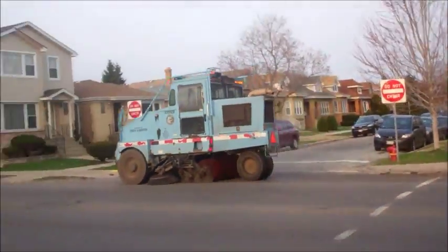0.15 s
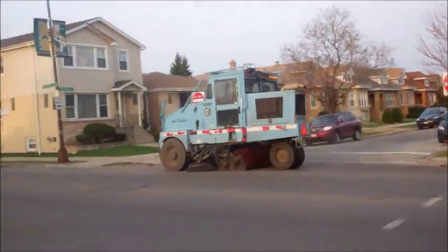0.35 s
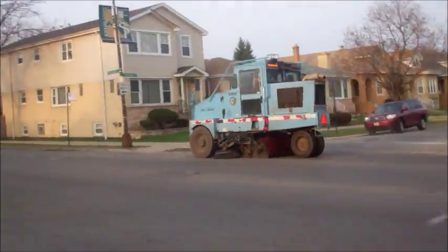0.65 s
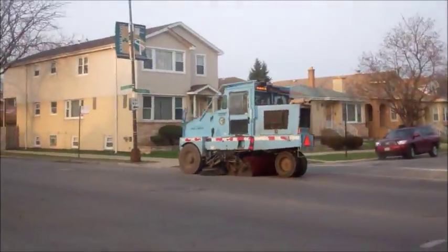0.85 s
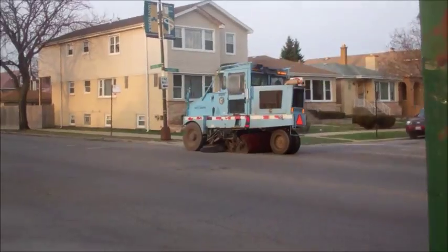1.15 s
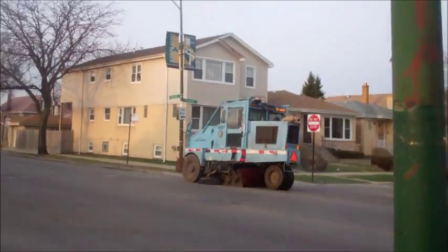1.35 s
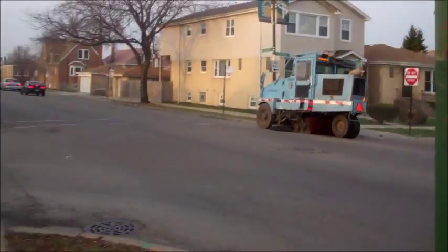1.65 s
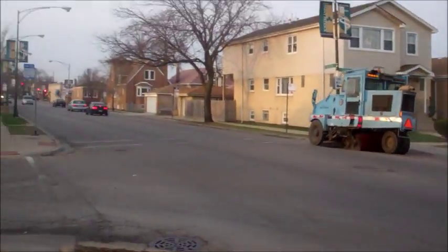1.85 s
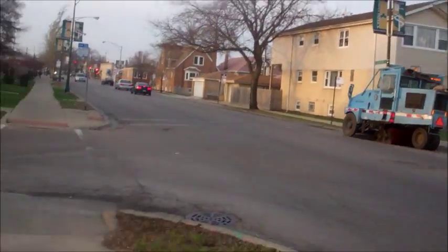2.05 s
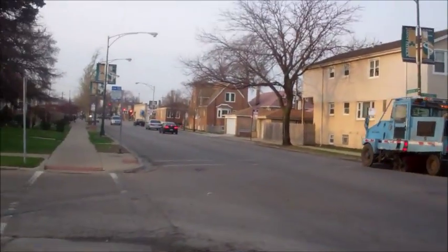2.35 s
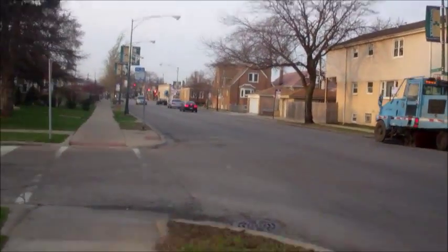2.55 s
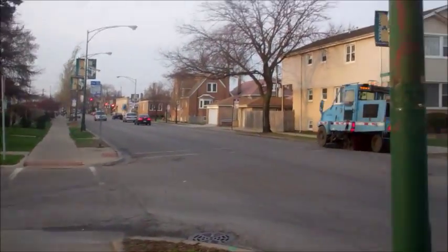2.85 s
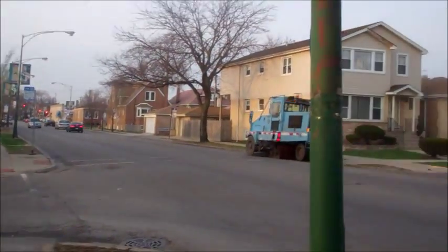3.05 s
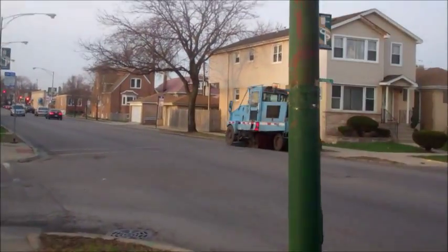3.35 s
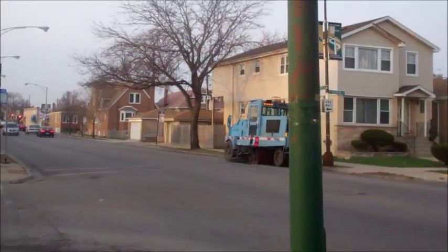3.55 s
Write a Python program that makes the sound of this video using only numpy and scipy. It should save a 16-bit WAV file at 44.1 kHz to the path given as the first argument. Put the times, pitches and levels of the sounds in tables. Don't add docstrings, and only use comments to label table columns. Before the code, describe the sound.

A street sweeper drones and roars, its brushes hissing on asphalt while wind buffets the microphone.

```python
import sys
import numpy as np
from scipy import signal
from scipy.fft import rfft, irfft
from scipy.io import wavfile
from scipy.ndimage import uniform_filter1d

SR = 44100
rng = np.random.default_rng(int(sys.argv[2]) if len(sys.argv) > 2 else 0)


def put_to_file(sound):
    columns = np.atleast_2d(sound).T
    safe = np.clip(columns, -1, 1)
    whole_steps = np.round(safe * 32767)
    wavfile.write(sys.argv[1], SR, whole_steps.astype(np.int16))


def volts_from_decibels(level):
    exponent = np.asarray(level, float) / 20
    return 10 ** exponent


N = 163611
TIME_S = np.arange(N) / SR
FRAME_S = np.arange(N // 256 + 5) * 256 / SR
HZ = np.fft.rfftfreq(1024, 1 / SR)

# [t/s, firing rate f/Hz, turned away 0-1.4]
DRIVE = [(0, 76.7, 0), (.5, 76.9, .1), (1, 77.7, .3), (1.6, 78.5, .55), (2.2, 78.5, .9), (2.8, 78.6, 1),
         (3.3, 78.6, 1.15), (3.71, 78.5, 1.35)]
# [t/s, lag/microseconds]
LAG = [(.18, -5), (.55, 10), (.9, 15), (1.3, 3), (1.65, 19), (2, 47), (2.35, 44.5), (2.7, 55), (2.9, 44),
       (3.1, 26), (3.35, 5), (3.6, -4)]
LAG_FROM_HZ = 3200


def evened(x):
    return x / np.sqrt(np.mean(x ** 2) + 1e-20)


def read(points, hz):
    f, value = np.transpose(points)
    return np.interp(np.log(hz + 1), np.log(f + 1), value)


def curve(table, t, axis=1):
    points = np.array(table)
    return np.interp(t, points[:, 0], points[:, axis])


def drift(top_hz, t):
    phases = rng.random(24)
    rates = np.geomspace(top_hz / 10, top_hz, len(phases))
    return evened(sum(np.sin(2 * np.pi * (f * t + p)) / np.sqrt(f) for f, p in zip(rates, phases)))


def coarse_drift(top_hz):
    return np.repeat(drift(top_hz, TIME_S[::64]), 64)[:N]


def rush(field_db, same, patchy_db, flicker_db):
    a, b, c, d, patches = rng.standard_normal((len(FRAME_S), len(HZ), 5)).T
    patches = uniform_filter1d(patches, size=14, axis=0)
    patches = evened(uniform_filter1d(patches, size=7, axis=1))
    shared = a + 1j * b
    private = c + 1j * d
    lagging_hz = HZ - 0.47 * HZ / (1 + (HZ / LAG_FROM_HZ) ** 6)
    late = np.exp(-2j * np.pi * lagging_hz[:, None] * curve(LAG, FRAME_S) / 10 ** 6)
    z = np.array([shared * late, same * shared + np.sqrt(1 - same ** 2) * private])
    z *= volts_from_decibels(field_db + patchy_db * patches + flicker_db * drift(25.11, FRAME_S))
    return signal.istft(z, nperseg=1024, noverlap=768)[1][:, :N]


def layer(spectrum, swing_db, level_db, same, patchy_db, flicker_db):
    field_db = read(spectrum, HZ)[:, None] + swing_db
    return volts_from_decibels(level_db) * evened(rush(field_db, same, patchy_db, flicker_db))


def ports():
    # [f/Hz, likeness 0-1]
    likeness = [(60, 0.93), (700, 0.96), (1400, 0.87), (2750, 0.85), (4800, .66), (6900, 0.4), (8300, 0.82),
                (14000, 0.59)]
    loss_per_us = 0.0036
    lag_us = np.maximum(curve(LAG, FRAME_S), 0)
    loss = loss_per_us * lag_us / (1 + (HZ[:, None] / LAG_FROM_HZ) ** 4)
    return np.clip(read(likeness, HZ)[:, None] * (1 - loss), 0, .99)


def wind():
    # [t/s, level/dB]
    gusts = [(0, -61), (1.75, -51.5), (1.95, -43), (2.2, -39), (2.5, -45), (2.75, -38), (3, -43),
             (3.5, -49), (3.71, -53)]
    # [f/Hz, level/dB per Hz]
    rumble = [(25, -22), (60, -6), (150, 2), (300, 3), (450, 2), (650, -14), (1000, -36)]
    # [t/s, peak level/dB, f/Hz]
    pops_left = [(.556, -29, 198), (.572, -25, 200), (1.86, -28, 153), (2.17, -16.5, 222),
                 (2.196, -20, 260), (2.219, -18, 300), (2.227, -25, 400), (2.245, -25, 230),
                 (2.259, -21, 320), (2.281, -25, 150), (2.346, -29, 200), (2.402, -20.5, 250),
                 (2.458, -24, 150), (2.537, -26, 200), (2.576, -28, 130), (2.716, -21, 280),
                 (2.724, -22, 402), (2.739, -15.5, 252), (3.218, -29, 150), (3.23, -21, 252),
                 (3.442, -21, 348.7), (3.529, -36, 200)]
    # [t/s, peak level/dB, f/Hz]
    pops_right = [(0.357, -26, 130), (0.601, -29, 130), (1.99, -22, 300), (2.002, -17.5, 370),
                  (2.019, -18, 250), (2.499, -20, 350), (2.968, -30, 120), (3.062, -21, 180),
                  (3.465, -18, 350), (3.49, -16, 190), (3.529, -16, 257), (3.628, -36, 220),
                  (3.704, -30, 200)]
    db = curve(gusts, FRAME_S)
    out = layer(rumble, db - db.mean(), db.mean(), 0, patchy_db=-1.5, flicker_db=4.0)
    for port, pops in enumerate((pops_left, pops_right)):
        for s, peak_db, hz in pops:
            cycles = (TIME_S - s) * hz
            out[port] += volts_from_decibels(peak_db) * np.sin(2 * np.pi * cycles - 1.0) * np.exp(-(cycles / 0.52) ** 2)
    return out


def housing():
    # [t/s, f/Hz, level/dB]
    whistle = [(0, 1420, -45), (.35, 1460, -47), (.7, 1460, -51), (1.05, 1900, -46), (1.25, 1880, -44),
               (1.45, 1840, -52), (1.68, 1830, -44), (1.95, 1810, -53), (2.5, 1780, -54),
               (2.8, 1880, -41.5), (3, 1870, -48), (3.3, 1830, -43), (3.5, 1820, -42.5),
               (3.71, 1800, -42.5)]
    width_hz = 110
    shape = 1 / (1 + ((HZ[:, None] - curve(whistle, FRAME_S)) / width_hz) ** 2)
    hiss = evened(rush(20 * np.log10(shape), ports(), patchy_db=-1.5, flicker_db=-3.0))
    return volts_from_decibels(curve(whistle, TIME_S, axis=2)) * hiss


def brushes():
    # [f/Hz, level/dB per Hz]
    bristles = [(800, -46), (2000, -15), (3500, -1.5), (5000, -1.5), (7000, -3), (10000, -2), (12500, -0.5),
                (14200, 1)]
    # [t/s, level/dB]
    pressure = [(0, -25), (.2, -26.5), (.47, -23), (.56, -26.5), (.81, -28), (.9, -25.5), (1.08, -29),
                (1.25, -27.5), (1.75, -27), (1.92, -28), (2.46, -28.5), (2.58, -25.5), (2.7, -31),
                (2.84, -27.5), (3.15, -29), (3.27, -27), (3.4, -30.5), (3.6, -27), (3.71, -26.5)]
    brighten = 0.17
    db = curve(pressure, FRAME_S)
    share = 1 + brighten * np.log2(HZ / 7000 + 0.071)[:, None]
    swing_db = share * (db - db.mean())
    return layer(bristles, swing_db, db.mean() + 4.0, ports(), patchy_db=0.65, flicker_db=0.5)


def fan():
    # [f/Hz, level/dB per Hz]
    body = [(30, -24), (60, -18), (110, -9), (200, -3), (380, -7.5), (950, -6), (2400, -6.5), (5000, -12.5)]
    # [t/s, level/dB]
    roar = [(0, -34), (.5, -35), (1.1, -37.5), (1.25, -35.5), (1.36, -38), (1.75, -36), (1.88, -38.5),
            (2, -35.5), (2.58, -35), (2.65, -38.5), (2.83, -35), (2.91, -41.5), (3.01, -37), (3.4, -36.5),
            (3.5, -34), (3.71, -36)]
    db = curve(roar, FRAME_S)
    return layer(body, db - db.mean(), db.mean() + 5.0, ports(), patchy_db=1.13, flicker_db=0.5)


def intake():
    # [f/Hz, width/Hz, level/dB]
    hollows = [(620, 68, -7), (653, 43, -11), (690, 34, -5), (944, 33, -8.5), (1373, 60, -5),
               (1880, 240, -17)]
    # [t/s, level/dB]
    mouth = [(0, -42), (.1, -38.5), (.45, -38.5), (.6, -40), (.72, -42), (.9, -43), (1.12, -40.5),
             (1.22, -56), (1.36, -42), (1.5, -50), (1.62, -49), (1.8, -52), (2.6, -51), (2.75, -38.5),
             (2.92, -49), (3.1, -46), (3.35, -48), (3.48, -41), (3.71, -43.5)]
    # [t/s, pitch factor]
    swing = [(0, 1.01), (.2, 1.06), (.35, .98), (.5, 1.06), (.7, 1), (.88, 1), (1.05, 1), (1.3, 1.06),
             (1.6, 1.12), (2.3, 0.92), (2.9, 0.8), (3.1, 0.96), (3.71, 0.88)]
    throb_depth = .3
    seen = HZ[:, None] / curve(swing, FRAME_S)
    shape = sum(volts_from_decibels(db) / (1 + ((seen - hz) / width) ** 2) for hz, width, db in hollows)
    air = evened(rush(20 * np.log10(shape), ports() ** 0.77, patchy_db=0.0, flicker_db=0.1))
    firings = np.cumsum(curve(DRIVE, TIME_S)) / SR
    throb = 1 + throb_depth * np.cos(2 * np.pi * firings)
    return volts_from_decibels(curve(mouth, TIME_S)) * throb * air


def engine():
    # [t/s, level/dB]
    pump_load = [(0, -53), (.36, -52), (.43, -46), (.95, -43), (1.12, -45), (1.19, -56), (1.5, -51),
                 (1.7, -44), (2.3, -44), (2.8, -41.5), (3.12, -44), (3.2, -52), (3.33, -51), (3.44, -40),
                 (3.71, -42)]
    # [t/s, level/dB]
    exhaust = [(0, -39.5), (.6, -39.5), (1, -39), (1.6, -39), (2.2, -36.5), (2.65, -38), (2.8, -31.5),
               (2.95, -36.5), (3.3, -33.5), (3.71, -36)]
    # [multiple of half the firing rate, side-on level/dB, level from behind/dB]
    crank = [(3, -36, -18.5), (5, -14, -15), (7, -9.5, -10), (8, -17, -15.5), (9, -22, -15), (10, -31, -21),
             (14, -45, -28), (15, -9, -23), (16, -6, -18), (17, -4.5, -18), (19, -12, -49), (36, -20, -17)]
    # [t/s, firing level/dB, second level/dB, third level/dB, ninth level/dB]
    strong = [(0, -41, -39, -42, -38.5), (.25, -44, -40, -46, -45), (.45, -44, -39.5, -42.5, -43.5),
              (.65, -44, -40, -42, -58), (.85, -44.5, -44, -44, -56), (1.05, -43.5, -45, -43.5, -40.5),
              (1.25, -48.5, -42.5, -47, -54), (1.45, -47, -43, -49, -57), (1.65, -47, -42.5, -44, -63),
              (1.85, -46.5, -43, -42.5, -59), (2.05, -49, -43, -40.5, -70), (2.25, -45, -37.5, -38, -56),
              (2.45, -46, -40.5, -39.5, -60), (2.65, -47, -39.5, -43, -65), (2.85, -53, -40.5, -42.5, -67),
              (3.05, -47, -44.5, -39.5, -65), (3.25, -51, -43, -40, -73), (3.45, -49, -41, -36, -67),
              (3.71, -57, -40, -36, -62)]
    pump_order, pump_trim_db, pump_waver_db = 6, -2.0, .6
    wobble = .002
    pulse_spread = .16
    waver_db, strong_waver_db = 1.0, .5

    speed_hz = curve(DRIVE, TIME_S) / 2
    turns = np.cumsum(speed_hz * (1 + wobble * drift(8.01, TIME_S))) / SR
    away = np.clip(curve(DRIVE, TIME_S, axis=2), 0, 1.4)

    pump_db = curve(pump_load, TIME_S) + pump_trim_db + pump_waver_db * drift(19, TIME_S)
    out = volts_from_decibels(pump_db) * np.sqrt(2) * np.sin(4 * np.pi * pump_order * turns)
    for multiple, side_db, rear_db in crank:
        db = side_db + (rear_db - side_db) * away + waver_db * coarse_drift(10)
        cycles = multiple * turns + pulse_spread * coarse_drift(.9)
        out -= volts_from_decibels(curve(exhaust, TIME_S) + db) * np.cos(2 * np.pi * cycles)
    for column, multiple in enumerate((2, 4, 6, 18), start=1):
        db = curve(strong, TIME_S, axis=column) + strong_waver_db * coarse_drift(10)
        cycles = multiple * turns + pulse_spread * coarse_drift(.9)
        out -= volts_from_decibels(db) * np.sqrt(2) * np.cos(2 * np.pi * cycles)
    return out


def scene():
    # [f/Hz, left minus right level/dB]
    lean = [(60, -5.5), (250, -8), (1290, -7), (2400, -6.5), (4000, -4), (7000, -6.5), (10500, -6),
            (14000, -9)]
    # [f/Hz, width/Hz, level/dB]
    cavity = [(7040, 240, 1), (10440, 630, -5)]
    machine = engine() + intake() + fan() + brushes() + housing()
    hz = np.fft.rfftfreq(2 * N, 1 / SR)
    lean_db = np.array([[.5], [-.5]]) * read(lean, hz)
    lean_db[0] += sum(db * np.exp(-((hz - centre_hz) / width) ** 2) for centre_hz, width, db in cavity)
    leaning = irfft(rfft(machine, 2 * N) * volts_from_decibels(lean_db), 2 * N)[:, :N]
    return leaning + wind()


def top_cut(x):
    return signal.sosfilt(signal.butter(12, 14770, fs=SR, output="sos"), x)


def record(dry):
    bass_cut_hz, edge_hz = 38, 14195
    cut = signal.sosfilt(signal.butter(2, bass_cut_hz, "high", fs=SR, output="sos"), dry)
    edge = signal.firwin(2047, edge_hz, window=("kaiser", 7), fs=SR)
    limited = signal.oaconvolve(cut, edge[None], "same")
    return top_cut(limited)


dry = scene()
out = record(dry)
put_to_file(out)
```